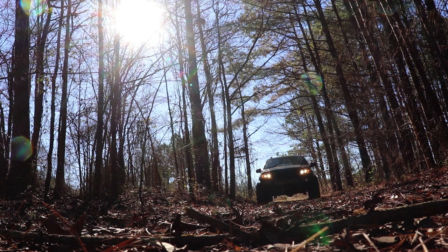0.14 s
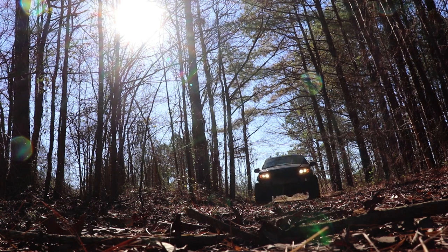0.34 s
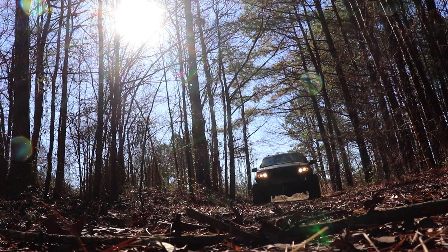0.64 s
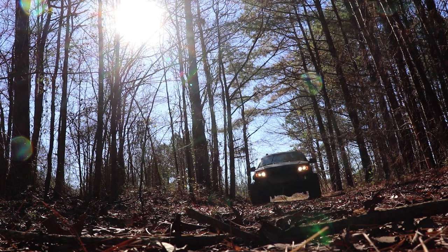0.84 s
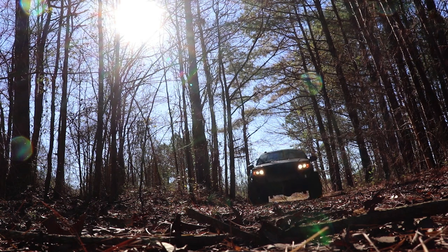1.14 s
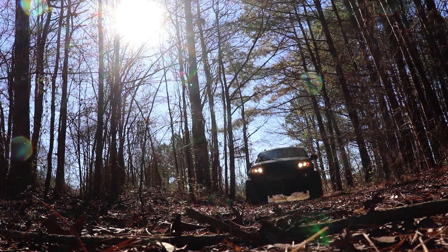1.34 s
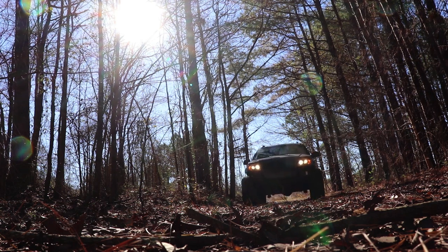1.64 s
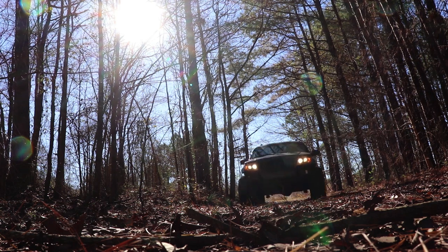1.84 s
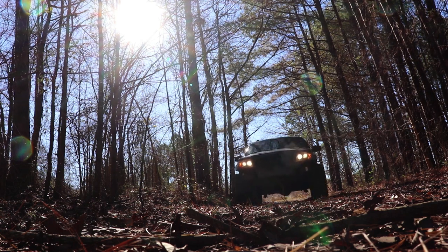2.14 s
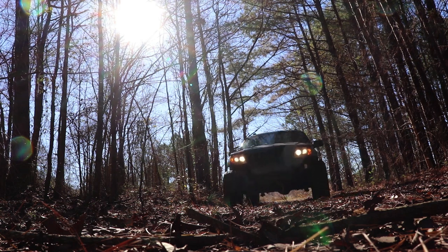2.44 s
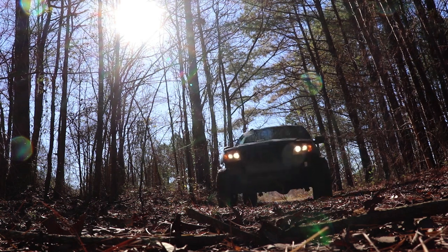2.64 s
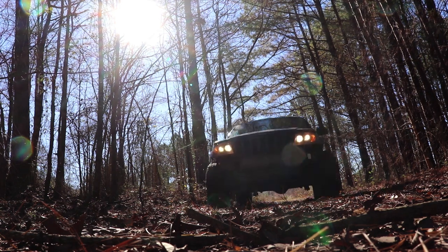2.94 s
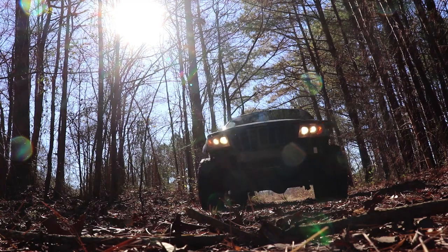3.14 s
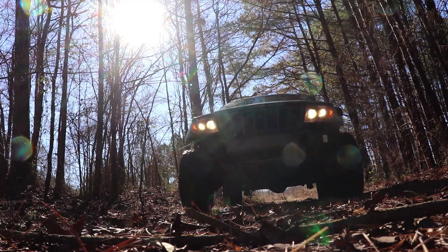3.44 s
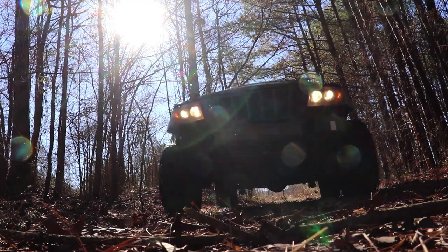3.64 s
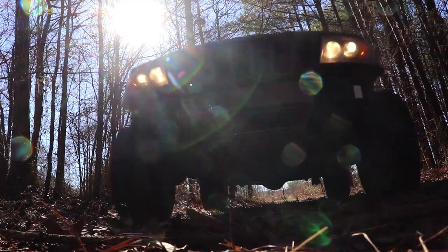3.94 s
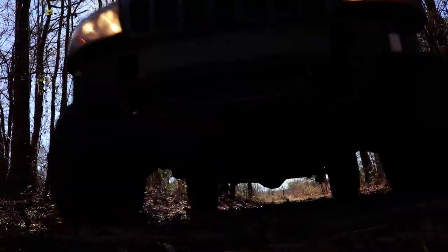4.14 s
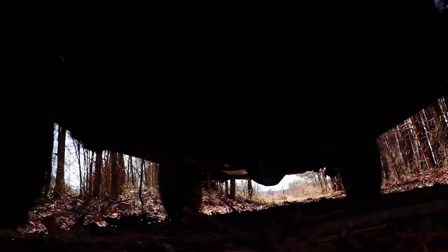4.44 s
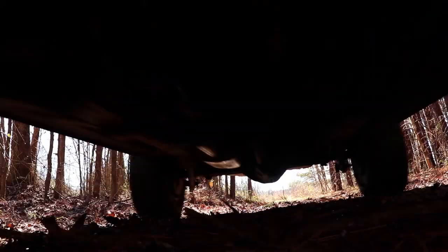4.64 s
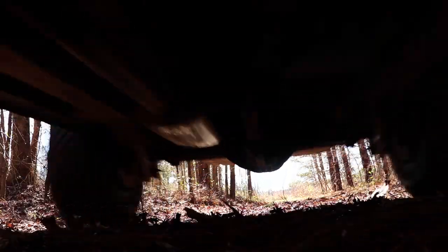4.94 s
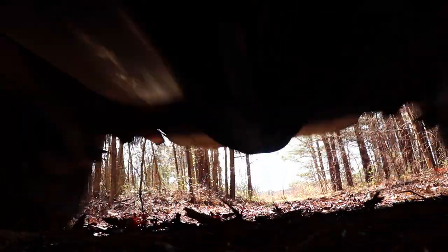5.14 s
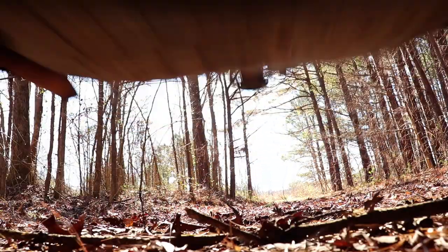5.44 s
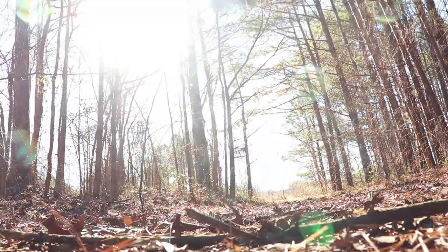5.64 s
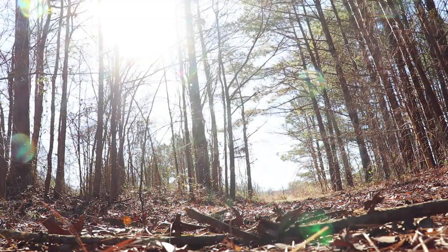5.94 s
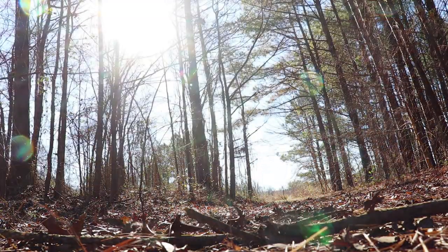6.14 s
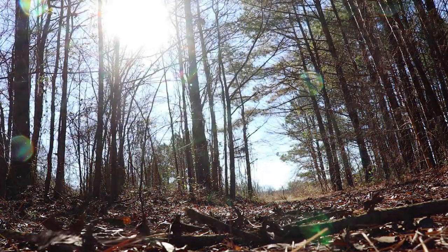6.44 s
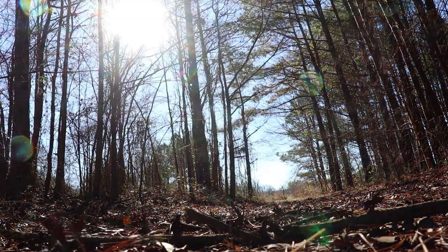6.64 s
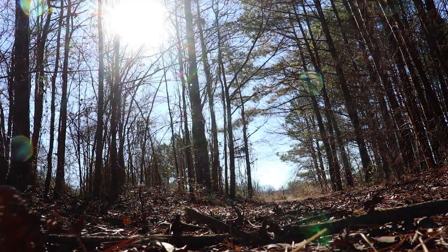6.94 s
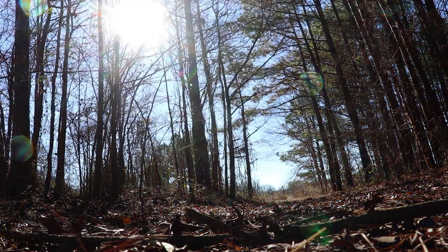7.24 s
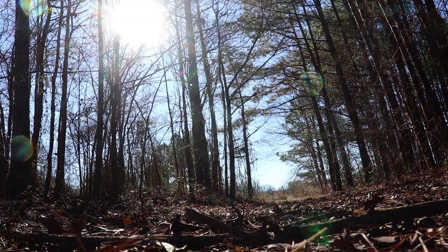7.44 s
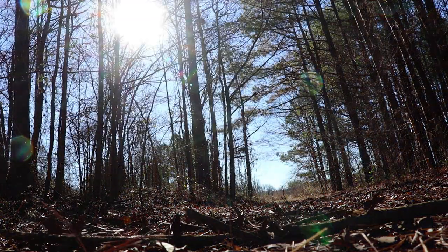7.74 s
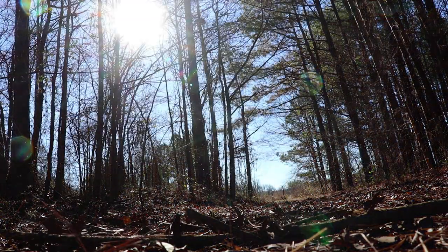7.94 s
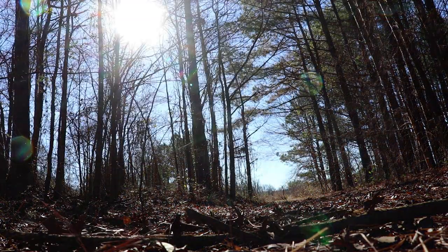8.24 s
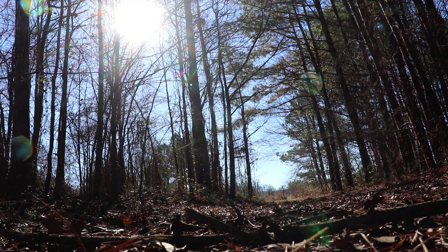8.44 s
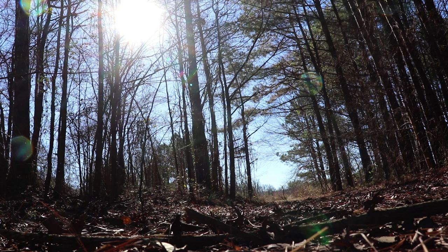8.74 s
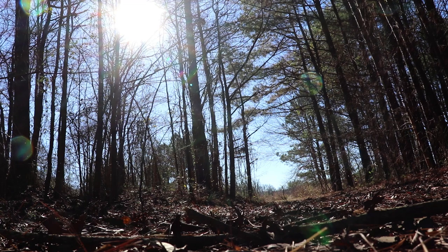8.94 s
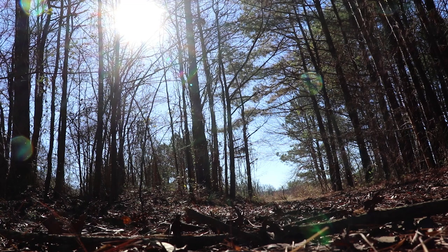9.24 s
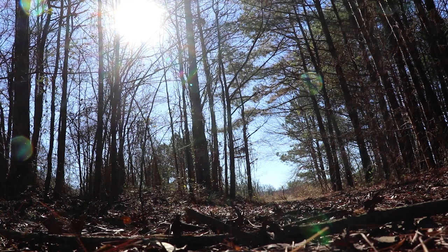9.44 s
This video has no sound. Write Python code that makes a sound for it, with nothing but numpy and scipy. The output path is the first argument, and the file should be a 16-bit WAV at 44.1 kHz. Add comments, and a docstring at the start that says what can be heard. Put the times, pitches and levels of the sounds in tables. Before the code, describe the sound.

Heard from ground level among dry leaves in a wood, an off-road vehicle pulls away from a low idle and rumbles slowly closer, fan whirring and tyres rustling. It passes right overhead with a close crunch of leaves and soil and sharp twig cracks. The tailpipe follows with loud, rhythmic puffs, then the crackle thins out while the throbbing engine settles to idle just beyond.

```python
"""A V8 idles a little way up a woodland trail, then pulls towards a camera lying in dry leaves.
The four-wheel-drive comes nose first, its cooling fan roaring and humming, rolls right over the
microphones, tyres crushing leaves and twigs, and eases back to idle beyond them. Uneven firings
make the exhaust throb once an engine cycle; from behind, the tailpipe chuffs and rasps."""
import sys
import numpy as np
from scipy import signal
from scipy.fft import rfft, irfft
from scipy.io import wavfile
from scipy.ndimage import uniform_filter1d

SR = 44100
rng = np.random.default_rng(int(sys.argv[2]) if len(sys.argv) > 2 else 0)


def bounce(signal):
    """Save signal as a 16-bit WAV file at the path given by the first command-line argument."""
    frames = np.transpose(np.atleast_2d(signal))
    limited = np.clip(frames, -1, 1)
    pcm = np.round(limited * 32767).astype(np.int16)
    wavfile.write(sys.argv[1], SR, pcm)


N = 423360
TIME = np.arange(N) / SR
NOSE_OVER_S, ENGINE_PAST_S = 4.4, 4.87  # the nose reaches the camera; the engine has cleared it

# engine speed: t/s, speed/rpm
ENGINE_RPM = [(0.0, 738.0), (0.34, 686.0), (0.71, 797.0), (1.12, 1179.0), (1.56, 1385.0), (2.07, 1259.0),
              (2.54, 1243.0), (3.56, 1308.0), (4.65, 1084.0), (4.97, 1004.0), (5.55, 905.0), (6.14, 882.0),
              (6.99, 888.0), (7.66, 853.0), (8.25, 827.0), (8.52, 823.0), (9.06, 699.0), (9.6, 703.0)]
# sharp exhaust puffs: place in the engine cycle/0-1, relative level/dB
SHARP_PUFFS = [(.1, 1), (.25, -3), (.42, -5), (.57, -3), (.72, -3), (.92, -3)]


def amp(db):
    """Decibels to amplitude."""
    return 10 ** (np.asarray(db) / 20)


def unit_rms(x):
    """Scales to an RMS of one."""
    return x / np.sqrt(np.mean(x ** 2) + 1e-20)


def curve(rows):
    """Joins (t/s, value) rows by straight lines."""
    return np.interp(TIME, *np.transpose(rows))


def at_hz(rows, hz):
    """Reads (f/Hz, value) rows on a log-frequency axis."""
    f, value = np.transpose(rows)
    return np.interp(np.log(hz + 1), np.log(f + 1), value)


def wander(rate_hz):
    """Slow random drift of unit size."""
    hz = np.fft.rfftfreq(N, 1 / SR)
    return unit_rms(irfft(rfft(rng.standard_normal(N)) / (1 + (hz / rate_hz) ** 4), N))


def at_mics(pair, spectrum, band_hz):
    """Colours two noises, alike in the bass and wide in the treble; their mid has unit level in the band."""
    # likeness of left and right: f/Hz, coherence/0-1
    coherence = [(100, 1), (300, .99), (600, 0.98), (1000, 0.93), (2000, 0.6), (4000, 0.23), (8000, 0.26),
                 (14000, 0)]
    hz = np.fft.rfftfreq(N, 1 / SR)
    alike = np.clip(at_hz(coherence, hz), 0, 1)
    mid, side = rfft(pair) * amp(at_hz(spectrum, hz))
    side = side * np.sqrt((1 - alike) / (1 + alike))
    band_rms = np.std(irfft(mid * (hz > band_hz[0]) * (hz < band_hz[1]), N))
    return irfft(np.array([mid + side, mid - side]), N) / band_rms


def past():
    """How far the engine has gone over the camera, 0-1."""
    return curve([(NOSE_OVER_S, 0), (ENGINE_PAST_S, 1)])


def speed_octaves(pulling_rpm=1250):
    """Engine speed in doublings above its pulling speed."""
    return np.log2(curve(ENGINE_RPM) / pulling_rpm)


def leaf_swish():
    """Leaves swept aside by the tyres: a papery hiss that swells as they near the camera."""
    # the approach: t/s, level/dB
    swell = [(0, -57), (1.5, -42.5), (2.5, -40.5), (3.3, -35.5), (4, -32.5), (4.6, -33.5), (5, -59.5)]
    # the hiss: f/Hz, level/dB
    spectrum = [(1500, -40), (2700, -5), (3400, 0), (4300, 3), (5300, -1), (7000, -6), (12000, -21)]
    rustle = rng.standard_normal((2, N)) * amp(.7 * wander(30))
    return unit_rms(at_mics(rustle, spectrum, (1200, 3500))) * amp(curve(swell))


def crackle(per_s, spread_db, wash, clump_db, grain_s=.00015):
    """Tiny fractures of uneven size, in clumps, over the wash of countless smaller ones."""
    sizes = amp(spread_db * np.minimum(rng.exponential(1, (2, N)), 4))
    clicks = sizes * rng.choice([-1, 1], (2, N)) * (rng.random((2, N)) < per_s / SR)
    t = np.arange(256) / SR
    grain = rng.standard_normal((2, len(t))) * np.exp(-t / grain_s)
    grains = signal.oaconvolve(clicks, grain, axes=1)[:, :N]
    fractures = unit_rms(unit_rms(clicks) + .5 * unit_rms(grains))
    return (fractures + wash * rng.standard_normal((2, N))) * amp(clump_db * wander(17.6))


def axle_pass(s, nearing_db_per_s=9, leaving_db_per_s=52):
    """Swells as an axle nears the camera and falls quickly once it is past."""
    return amp(-nearing_db_per_s * np.maximum(s - TIME, 0) - leaving_db_per_s * np.maximum(TIME - s, 0))


def crush(start, length, attack_s=.0088, release_s=.019):
    """Envelope of one clump of leaves giving way."""
    attack = np.clip((TIME - start) / attack_s, 0, 1)
    return attack * np.exp(-np.maximum(TIME - start - length, 0) / release_s)


def tyres(behind_db=-3, soil_trim_db=-1, leaf_band_hz=(5500, 14000), soil_band_hz=(1200, 3500)):
    """Leaves hiss from afar and crackle close by, where each axle crushes them and grinds the soil."""
    # leaves under the tyres, at a distance: t/s, level/dB
    rolling_level = [(0, -48.5), (.7, -48.5), (1.2, -42.5), (3.2, -39), (3.9, -49), (5.85, -52.5),
                     (7.1, -55), (7.3, -51.5), (8.8, -56.5), (9.6, -61)]
    # each axle passes the camera: t/s, soil level/dB, leaf level/dB
    axles = [(4.66, -30, -35.5), (5.54, -37, -39)]
    # clumps crushed close by: t/s, length/s, leaf level/dB, soil level/dB
    clumps = [(.85, .06, -51, -55), (1.54, .04, -47, -42), (2.56, .03, -46, -42), (4.36, .18, -36, -35),
              (4.57, .04, -44, -30), (4.634, .085, -34.5, -29.5), (4.73, .075, -37, -33),
              (4.84, .06, -33, -32), (4.96, .06, -48, -35), (5.086, .08, -39, -37),
              (5.245, .24, -37.5, -41), (5.52, .15, -39, -38), (5.69, .04, -42, -43), (5.74, .05, -36, -42),
              (5.907, .1, -47, -53), (6.055, .055, -47, -57), (7.3, .04, -51, -62), (7.59, .02, -53, -60)]
    # spectra of distant leaves, close leaves and soil: f/Hz, level/dB
    far_spectrum = [(500, 15), (1500, 7.5), (2600, -0.5), (3800, 0), (5000, 3), (6800, 0.5), (9300, 1),
                    (11500, -5.5), (13000, -7), (15800, -17)]
    near_spectrum = [(500, -10), (1500, 1), (3300, 1.5), (5200, 4), (6800, 3), (8600, 3), (11500, -1),
                     (13200, -2.5), (15800, -6.5)]
    soil_spectrum = [(250, 3), (700, -12), (1000, 4), (1330, 3.5), (1750, 0.5), (2400, -1.5), (3200, -3.5),
                     (4400, -9), (6500, -12.5), (12000, -45)]
    rolling = amp(curve(rolling_level))
    near_power = sum((amp(db) * axle_pass(s)) ** 2 for s, _, db in axles)
    near_power += past() * (amp(behind_db) * rolling) ** 2
    soil_power = sum((amp(db) * axle_pass(s)) ** 2 for s, db, _ in axles)
    for start, length, leaf_db, soil_db in clumps:
        giving_way = crush(start, length)
        near_power += (amp(leaf_db) * giving_way) ** 2
        soil_power += (amp(soil_db) * giving_way) ** 2
    far = at_mics(crackle(per_s=3200, spread_db=5.5, wash=3.5, clump_db=.7), far_spectrum, leaf_band_hz)
    near = at_mics(crackle(per_s=1300, spread_db=4, wash=.7, clump_db=1.6), near_spectrum, leaf_band_hz)
    soil = at_mics(crackle(per_s=1500, spread_db=2, wash=.8, clump_db=1), soil_spectrum, soil_band_hz)
    return rolling * far + np.sqrt(near_power) * near + amp(soil_trim_db) * np.sqrt(soil_power) * soil


def twigs(trim_db=-1.5, crack_s=.003, splinter_s=.02, splinter=.33, bleed=.064):
    """Each twig cracks, then splinters: crushed ones with a broad ring, settling ones with a narrow ping."""
    # twigs around the camera: t/s, relative peak level/dB, ring f/Hz, sharpness/Q
    snaps = [(3.93, -11, 1600, 1), (4.249, -18, 3600, .8), (4.39, -20, 6000, 1), (4.514, -13, 6100, .8),
             (4.679, -14, 3400, 1.3), (5.279, -21, 6500, 1.3), (5.468, -19.5, 7000, 1.3),
             (5.548, -22, 1940, 1.1), (5.649, -25, 6000, 1), (5.848, -40, 5150, 14), (5.941, -37, 3050, 7),
             (5.988, -37, 3600, 10), (6.072, -42, 3200, 10), (6.102, -31, 3600, 1.3),
             (6.55, -37, 6000, 1.5), (7.173, -34, 4600, 3), (7.176, -32, 8800, 1), (7.235, -40, 10300, 4)]
    out, t = np.zeros((2, N)), np.arange(4096) / SR
    hz = np.fft.rfftfreq(len(t), 1 / SR) + 1
    envelope = np.exp(-t / crack_s) + splinter * np.exp(-t / splinter_s)
    for s, peak_db, ring_hz, q in snaps:
        burst = rng.standard_normal((2, len(t))) * envelope
        resonance = 1 / (1 + 1j * q * (hz / ring_hz - ring_hz / hz)) ** 2
        snap = irfft(rfft(burst + bleed * burst[::-1]) * resonance) * (1 - t / t[-1])
        start = round(s * SR)
        out[:, start:start + len(t)] += amp(peak_db + trim_db) * snap / abs(snap.mean(0)).max()
    return out


def buffet(overhead_s=5.76, half_length_s=.14, level_db=-24):
    """Exhaust gas flutters on the microphones as the tailpipe passes overhead."""
    # the low flutter: f/Hz, level/dB
    spectrum = [(90, -15), (160, 0), (200, -2), (250, -7), (330, -25), (1000, -53)]
    flutter = at_mics(rng.standard_normal((2, N)), spectrum, (130, 280))
    return flutter * amp(level_db) * np.exp(-((TIME - overhead_s) / half_length_s) ** 2)


def pump(cycles, turns_per_cycle=40.6, half_length_s=.46, level_db=-26.5):
    """A belt-driven pump's wavering whir, heard only while the nose is overhead."""
    whir = np.sin(2 * np.pi * turns_per_cycle * cycles + 1.1 * wander(14))
    return amp(level_db) * whir * np.exp(-((TIME - NOSE_OVER_S) / half_length_s) ** 2)


def air_roar(cycles, nose_db=-24.5, db_per_octave=13, nearing_db_per_s=.49, gust_db=1, band_hz=(420, 900)):
    """Fan wash from the nose gives way to gas rush from the tail; both grow with engine speed."""
    # spectra ahead of the vehicle and behind it: f/Hz, level/dB
    nose_spectrum = [(30, -39), (65, -12), (100, 4.5), (190, -0.5), (260, 3), (350, 1.5), (480, -2),
                     (720, -3.5), (860, -8.5), (1500, -16.5), (2500, -33), (4000, -70), (9000, -66)]
    tail_spectrum = [(25, -29), (45, -18), (70, 5), (120, 9), (210, 5.5), (300, 7), (420, 1.5), (560, -3.5),
                     (830, -11.5), (1320, -14.5), (1750, -25), (2700, -30.5), (9000, -45)]
    # gas rush at pulling speed: t/s, level/dB
    tail_level = [(4.8, -29.5), (5.3, -27.5), (5.9, -33), (6.9, -29.5), (7.8, -26.5), (8.4, -28),
                  (9.1, -29.5)]
    firing_pulse = 1 + .053 * np.cos(2 * np.pi * 8 * cycles)
    nose, tail = rng.standard_normal((2, 2, N)) * firing_pulse * amp(gust_db * wander(15))
    # the gas surges with each sharp puff
    surges = sum(amp(db) * np.exp(-((cycles - place + .03) % 1) / .07) for place, db in SHARP_PUFFS)
    tail = tail * unit_rms(1 + .45 * surges)
    nose_gain = amp(nose_db + nearing_db_per_s * (TIME - NOSE_OVER_S)) * (1 - past())
    wash = nose_gain * at_mics(nose, nose_spectrum, band_hz)
    rush = amp(curve(tail_level)) * past() * at_mics(tail, tail_spectrum, band_hz)
    return (wash + rush) * amp(db_per_octave * speed_octaves())


def fan(cycles, blades_per_cycle=27.72, level_db=-24, db_per_octave=20, nearing_db_per_s=.8, flutter_db=2.6):
    """The belt-driven fan's blade tone, shaken by the firings and hidden once the nose has passed."""
    db = level_db + db_per_octave * speed_octaves() + nearing_db_per_s * (TIME - NOSE_OVER_S)
    db += flutter_db * wander(18)
    shake = 1 + .5 * np.cos(2 * np.pi * 4 * cycles + wander(8))
    tone = np.sqrt(2) * np.sin(2 * np.pi * blades_per_cycle * cycles + .6 * wander(2.4))
    return tone * shake * amp(db) * (1 - past())


def puffs(cycles, pattern, modes, level_db, swell_s, side_db,
          t60_s=.095, uneven_db=.7, jitter_s=.0002, detune=.014):
    """Puffs return every engine cycle; each swells and rings in the tailpipe at a slightly new pitch."""
    out, t = np.zeros(N + SR), np.arange(SR // 8) / SR
    for place, puff_db in pattern:
        peaks = np.flatnonzero(np.diff(np.floor(cycles - place)))
        for at, (late, strong, sharp) in zip(peaks, rng.standard_normal((len(peaks), 3))):
            envelope = (1 - np.exp(-t / swell_s[at])) ** 2 * amp(-60 * t / t60_s)
            crest_s = t[envelope.argmax()]
            phase_per_hz = 2 * np.pi * (1 + detune * sharp) * (t - crest_s / 2)
            main, *sides = [amp(db) * np.sin(hz * phase_per_hz) for hz, db in modes]
            ring = (main + amp(side_db[at]) * sum(sides)) * envelope / envelope.max()
            start = max(at + round((late * jitter_s - crest_s) * SR), 0)
            out[start:start + len(t)] += amp(level_db[at] + puff_db + uneven_db * strong) * ring
    return out[:N]


def tailpipe(cycles, rasp_swell_s=.002):
    """Round puffs make a pitched chuff, purest with the pipe overhead; sharper ones rasp above it."""
    # the chuff at the camera: t/s, level/dB, swell/s, side modes' level/dB
    chuff_shape = [(4.7, -33, .012, -8), (5.18, -25, .016, -12), (5.31, -15, .018, -14),
                   (5.44, -13.5, .016, -14), (5.57, -16.5, .014, -14), (5.72, -16.5, .014, -14),
                   (5.97, -22.5, .007, 0), (6.15, -18.5, .006, 1), (6.65, -15, .007, -3),
                   (7.25, -13.8, .007, -4), (8.0, -17.5, .003, 3), (8.35, -22, .003, 5),
                   (8.77, -18, .008, -3), (8.95, -29, .008, 0)]
    # one strong and one weak round puff: place in the cycle/0-1, relative level/dB
    round_puffs = [(.13, 0), (.74, -13)]
    # pipe modes rung by round and by sharp puffs: f/Hz, relative level/dB
    chuff_modes = [(331, 0), (262, -9), (382, -7), (485, -14)]
    rasp_modes = [(262, 2), (364, 4), (485, -1), (620, -7), (735, -11)]
    # the rasp at the camera: t/s, level/dB
    rasp_level = [(4.6, -42), (5.3, -38), (5.85, -40), (6.15, -33), (7.2, -31), (8.0, -29.5), (8.55, -32.5),
                  (9.0, -37)]
    times, *columns = np.transpose(chuff_shape)
    level_db, swell_s, side_db = (np.interp(TIME, times, column) for column in columns)
    chuff = puffs(cycles, round_puffs, chuff_modes, level_db, swell_s, side_db)
    rasp = puffs(cycles, SHARP_PUFFS, rasp_modes, curve(rasp_level), np.full(N, rasp_swell_s), np.zeros(N))
    return chuff + rasp


def exhaust(cycle_hz, cycles, pipe_hz=133.6, half_width_hz=10, waver=.19,
            drone_hz=218, drone_half_width_hz=22, drone_db=4.5):
    """Uneven firings make harmonics of the cycle rate, which boom at the pipe's main resonance."""
    # the boom at the camera: t/s, level/dB
    boom_level = [(0.0, -26.5), (0.75, -26), (0.84, -9.5), (0.97, -11.5), (1.52, -15), (3.82, -15.5),
                  (4.36, -17.5), (4.76, -13), (5.4, -12), (7.08, -10.0), (8.3, -14.5), (9.6, -19.5)]
    # throttle, open from pulling away until the nose is overhead: t/s, load/0-1
    throttle = [(.6, 0), (.95, 0.94), (4.6, 0.94), (5.1, 0)]
    # coasting, when a second pipe resonance drones: t/s, share/0-1
    coasting = [(7.3, 0), (7.6, 1), (8.7, 1), (9.0, .4)]
    # cylinders in firing order: level/dB and lateness/ms off load, then the same on load
    cylinders = [(3.0, -1.7, 1.5, -0.5), (-3.9, 0.2, -1.4, -0.1), (1.6, -1.6, -2.7, -0.9),
                 (1.6, -1.6, 1.9, -0.4), (-0.9, -1.8, -2.2, 0.3), (-1.1, -4.1, -1.5, -0.1),
                 (-1.7, -0.5, 2.4, -0.9), (1.6, -1.6, 2.0, -0.2)]
    # pipe colour around the main resonance, off load and on load: f/Hz, level/dB
    easy_colour = [(45.0, 7.5), (62.0, 5.5), (80.0, 6.5), (105.0, 6), (125.0, 9), (150.0, -0.5),
                   (180.0, -0.5), (225.0, 9), (300.0, -10.5)]
    loaded_colour = [(50.0, -4.1), (85.0, -11.5), (110.0, 13), (140.0, 8), (175.0, 0.3), (205.0, 5),
                     (255.0, 10.5), (350.0, -6)]
    step = 64  # samples between updates of the harmonics
    t, rate = TIME[::step], cycle_hz[::step]
    load, coast = curve(throttle)[::step].clip(0, 1), curve(coasting)[::step]
    easy_db, easy_ms, loaded_db, loaded_ms = np.transpose(cylinders)[:, :, None]
    strength = amp(easy_db + load * (loaded_db - easy_db))
    late_s = (easy_ms + load * (loaded_ms - easy_ms)) / 1000
    firing_place = (np.arange(8)[:, None] - .4) / 8 + late_s * rate
    sound, boom_power = np.zeros(N), np.zeros(len(t))
    for order in range(5, 39):
        hz = order * rate
        harmonic = np.sum(strength * np.exp(-2j * np.pi * order * firing_place), axis=0)
        harmonic *= amp((1.5 - load) * at_hz(easy_colour, hz) + load * at_hz(loaded_colour, hz))
        harmonic *= amp(drone_db * coast / (1 + ((hz - drone_hz) / drone_half_width_hz) ** 2))
        harmonic /= 1 + 1j * (hz - pipe_hz) / half_width_hz
        if order > 8:  # these harmonics, up to about 175 Hz, set the boom's level
            boom_power += abs(harmonic) ** 2 / (1 + (hz / 175) ** 16)
        # no two cycles burn quite alike
        burn = unit_rms(uniform_filter1d(rng.standard_normal((2, len(t))), size=75))
        harmonic *= 1 + waver * (burn[0] + 1j * burn[1])
        phase = np.interp(TIME, t, np.unwrap(np.angle(harmonic)))
        sound += np.interp(TIME, t, abs(harmonic)) * np.cos(2 * np.pi * order * cycles + phase)
    return sound * amp(curve(boom_level)) / np.interp(TIME, t, np.sqrt(boom_power))


def scene():
    """Heard from the ground: the crank drives exhaust, fan and pump; the tyres work on the leaves."""
    # the engine's sound reaches the two microphones slightly apart: t/s, left lag/s
    left_lag = [(4.2, 0), (5.2, -.00011), (7.2, -.00008), (7.7, .00013)]
    cycle_hz = curve(ENGINE_RPM) / 120  # two crank turns to a cycle
    cycles = np.cumsum(cycle_hz) / SR
    tones = exhaust(cycle_hz, cycles) + fan(cycles) + pump(cycles) + tailpipe(cycles)
    left, right = tones + air_roar(cycles) + buffet()
    engine = np.array([np.interp(TIME - curve(left_lag), TIME, left), right])
    return engine + tyres() + leaf_swish() + twigs()


def record(dry):
    """The microphones' slight mismatch, then the camera's band limit."""
    # microphone balance: f/Hz, left minus right level/dB
    balance = [(600, .5), (1400, -1), (3100, -1.4), (5000, -1), (8000, 0.9)]
    # microphone phase: f/Hz, left lead/rad
    left_lead = [(60, -.12), (250, -.08), (1000, 0)]
    hz = np.fft.rfftfreq(N, 1 / SR)
    mismatch = amp(at_hz(balance, hz) / 2) * np.exp(.5j * at_hz(left_lead, hz))
    heard = irfft(rfft(dry) * np.array([mismatch, 1 / mismatch]), N)
    band_limit = signal.firwin(511, cutoff=15850, window=("kaiser", 9), fs=SR)
    return signal.oaconvolve(heard, band_limit[None], "same")


dry = scene()
out = record(dry)
bounce(out)
```